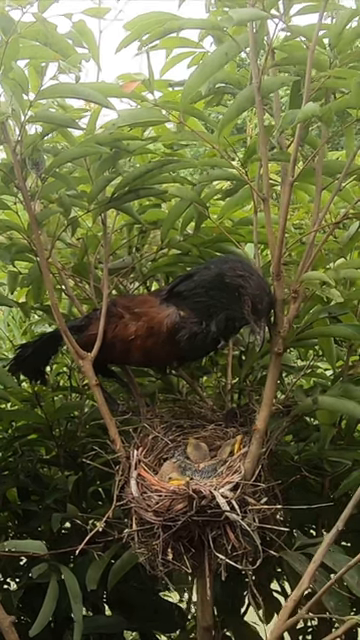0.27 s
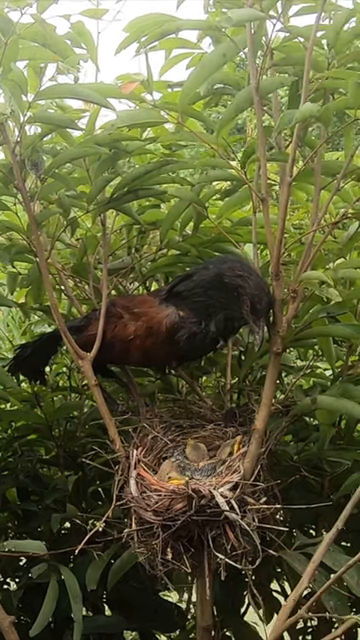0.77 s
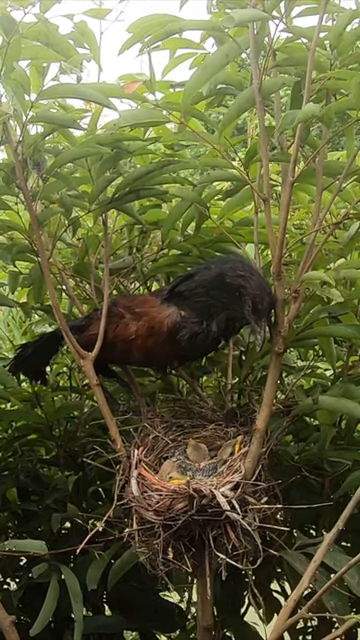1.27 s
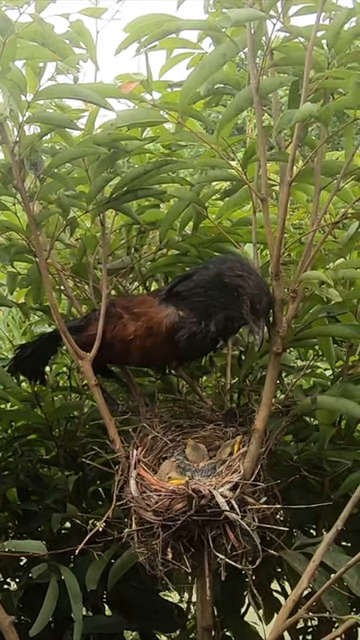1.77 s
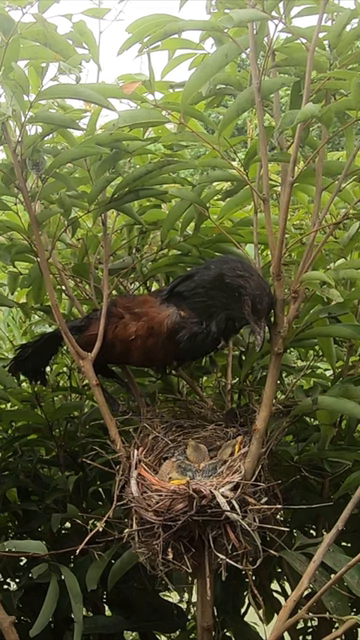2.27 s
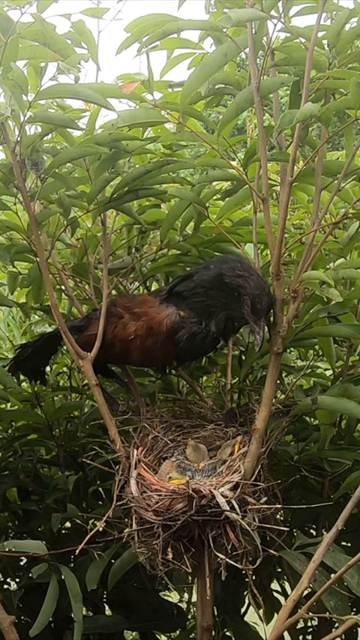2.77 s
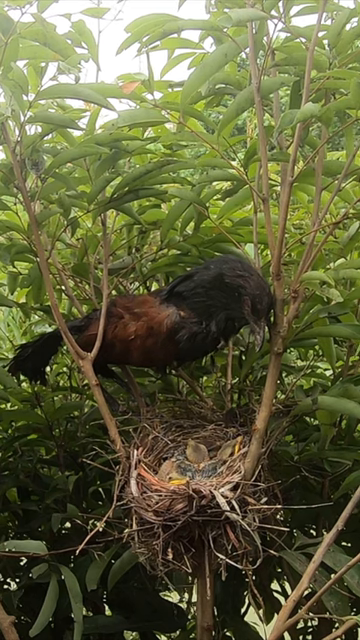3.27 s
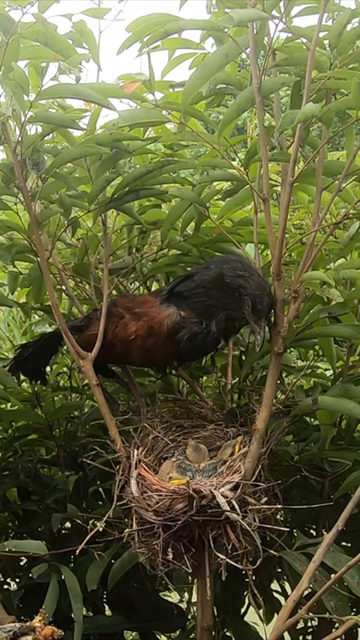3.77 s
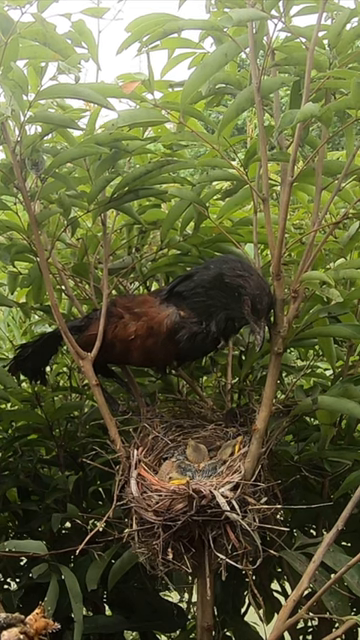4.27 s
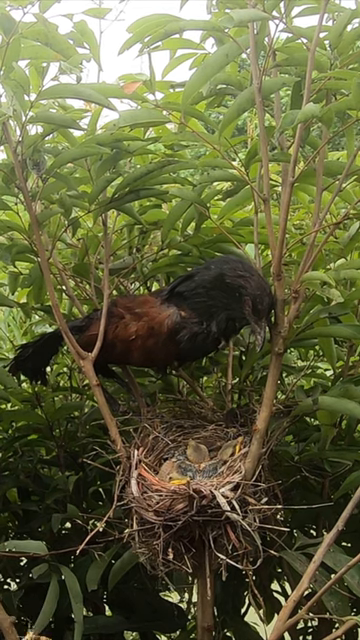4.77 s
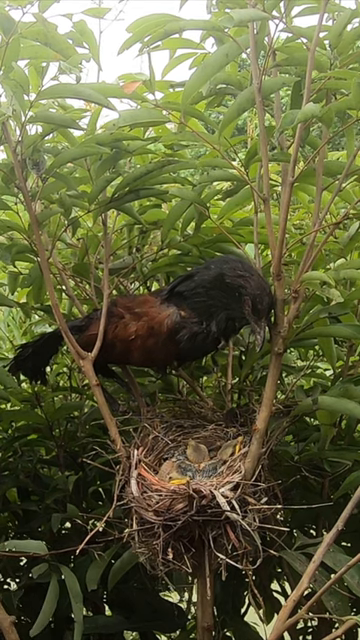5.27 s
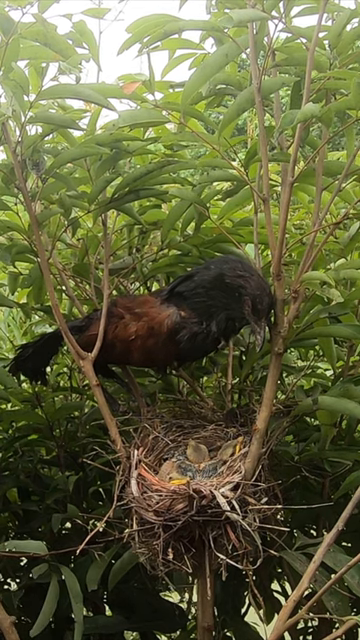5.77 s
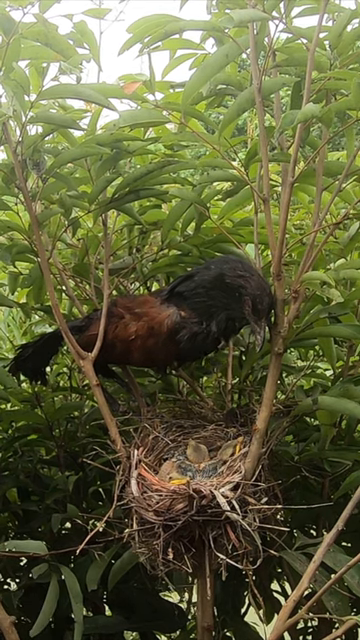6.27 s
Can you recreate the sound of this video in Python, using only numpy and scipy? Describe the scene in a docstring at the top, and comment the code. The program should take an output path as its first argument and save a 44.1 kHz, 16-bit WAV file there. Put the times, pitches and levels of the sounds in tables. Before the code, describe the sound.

A bird scolds from a leafy bush close to the microphone, giving sixteen harsh, rattling rasps across about six and a half seconds. Each lasts roughly a third of a second, grows louder and stops quickly, with a short pause before the next. The call cracks now and then, around 1 to 2.4 seconds, at 3.3 and near 5 seconds. The rasps are a little stronger from about 3 seconds and shorter toward the end. At about 1.7 seconds a low throb and rumble like a distant engine swells underneath and stays, with a faint wavering hum; at the same time the sound spreads from narrow to wide. A faint hollow drone comes and goes from about 2.6 seconds. Three soft taps fall between calls, near 2.1, 2.6 and 4.7 seconds. Quiet outdoor air continues throughout.

```python
"""Sixteen harsh rasps, close by: a bird scolding from a leafy bush.
Each rasp is a crescendo of about a hundred bursts a second, each burst a few sharp clicks ringing in
the throat; now and then the voice cracks. A low throb like a far engine swells underneath with a faint
hum, over a hollow drone, three soft taps and outdoor air. The sound starts narrow, then spreads."""
import sys
import numpy as np
from scipy import signal
from scipy.fft import rfft, irfft, next_fast_len
from scipy.io import wavfile

SR = 44100
rng = np.random.default_rng(int(sys.argv[2]) if len(sys.argv) > 2 else 0)


def dump(signal):
    """Clip the signal to [-1, 1] and save it as 16-bit WAV at the path in sys.argv[1]."""
    limited = np.clip(np.atleast_2d(signal).T, -1, 1)
    pcm = np.round(limited * 32767).astype(np.int16)
    wavfile.write(sys.argv[1], SR, pcm)


N = 287973

# start/s, end/s, relative end level/dB, crescendo/dB, 5 kHz ring/dB and 7 kHz edge/dB re body,
# flutter/Hz, flutter rise/fraction, beak opening/0-1, throat tuning/ratio, treble fizz/dB
RASP_CALLS = [(-0.1, 0.09, -28, 1.5, -8.5, -5.5, 116.8, 0.046, 0.0, 1, 3.5),
              (0.2561, 0.68, -25.5, 9.3, -9.5, -6, 113.9, 0.047, 0.0061, 1.0, 0),
              (0.8046, 1.131, -29.5, 0.87, -7.5, -6.5, 106.5, 0.028, 0.0, 1, -1.5),
              (1.2228, 1.534, -29.9, 3.8, -7, -6.5, 110, 0.084, 0.31, 1.01, -6),
              (1.665, 2.011, -26.5, 2.9, -11, -9.8, 105.9, 0.089, 0.4, 0.975, 4.0),
              (2.1601, 2.469, -25.5, 4.3, -7.5, -8.5, 105.3, 0.13, 0.54, 0.994, 6.5),
              (2.5847, 2.836, -25.5, 4.6, -6, -7, 105.6, 0.13, 1.0, 0.997, 4.5),
              (3.0156, 3.308, -23, 7.9, -5, -7, 104.1, 0.067, 0.93, 1.035, 3.5),
              (3.4475, 3.726, -24.5, 2.2, -10, -11.5, 104.9, 0.12, 0.94, 0.97, 8),
              (3.8873, 4.177, -24.5, 2.5, -7, -10, 101.6, 0.09, 0.99, 0.98, 9.5),
              (4.3231, 4.606, -24, 6, -8.5, -11.5, 103.5, 0.17, 1.0, 0.99, 4.5),
              (4.7337, 5.049, -24.5, 4.8, -5.5, -7.5, 101.75, 0.079, 0.77, 1.05, 6),
              (5.1685, 5.366, -29, 5.2, -12, -6.5, 101.1, 0.13, 0.35, 0.86, 7),
              (5.5047, 5.727, -26, 4.2, -9, -8.5, 100.3, 0.15, 0.94, 0.985, -23),
              (5.8962, 6.172, -24, 5.6, -8.5, -7.5, 101.5, 0.11, 0.89, 0.99, -29),
              (6.326, 6.528, -24, 4.3, -7.5, -8, 98, 0.086, 1.0, 1.008, -27)]
def bird(level_db=-2, shimmer_db=-13, treble_shimmer_db=-5):
    """Rasps in a bush; as the image spreads, the echoes part and the treble shimmers side to side."""
    voice = np.zeros(N)
    for row in RASP_CALLS:
        add(voice, *rasp(*row))
    echoes = foliage(voice)
    centre = echoes.mean(0)
    treble = band(voice, 7500, 16000)
    shimmer = (amp(shimmer_db) * voice + amp(treble_shimmer_db) * treble) * drift(120)
    sides = echoes - centre + np.array([shimmer, -shimmer])
    return amp(level_db) * (voice + centre + curve(STEREO_SPREAD) * sides)


# voice cracks: t/s, half length/s, body change/dB, ring and edge change/dB, fizz change/dB
VOICE_BREAKS = [(0.969, 0.012, -1, -7, 5), (1.112, 0.015, -4.8, -9, -5), (1.28, 0.017, -2.5, -8, 9),
                (1.797, 0.03, 1, 2.0, 12), (1.877, 0.014, -5, -8, 4), (2.007, 0.016, -3.5, -6, 4),
                (2.24, 0.026, -2.5, -8.5, 7.5), (2.325, 0.011, -6, -10, 7.5), (2.377, 0.0071, 4, 1.8, 10.5),
                (3.253, 0.03, -9.5, -8.5, 3.5), (3.296, 0.0085, -4, -11, 2.5), (4.95, 0.013, -3.7, -8.5, 2),
                (4.973, 0.013, -3, -3, 3.5), (5.222, 0.018, -11, -8, 3.5), (5.294, 0.011, -2.5, 2, 11.0)]
def rasp(start_s, end_s, level_db, swell_db, ring_db, edge_db, flutter_hz, rise, beak, tuning, fizz_db,
         attack_s=.026, release_db_per_s=950, glide=.011, sag=.85, full_crack_db=-8, brighten_db=4.5):
    """One call: the flutter speeds up and the throat tightens; in a crack its resonances sag."""
    t = np.arange(start_s, end_s + .04, 1 / SR)
    progress = (t - start_s) / (end_s - start_s)
    breaks = np.array([bump(t, at_s, half_s) for at_s, half_s, *_ in VOICE_BREAKS])
    body_break_db, ring_break_db, fizz_break_db = np.array(VOICE_BREAKS)[:, 2:].T @ breaks

    hz = np.fft.rfftfreq(1024, 1 / SR)
    drive = syrinx(len(t), flutter_hz, rise)
    slack = unit(resonate(drive, throat(hz / (tuning - glide), beak, fizz_db)))
    tight = unit(resonate(drive, throat(hz / (tuning + glide), beak, fizz_db)))
    cracked = unit(resonate(drive, throat(hz / (tuning * sag), beak / 2, fizz_db)))
    crack = np.clip(ring_break_db / full_crack_db, 0, 1)
    voice = np.sqrt(1 - crack ** 2) * (slack + progress * (tight - slack)) + crack * cracked
    voice = strain(voice, depth_db=3 + 3.5 * breaks.max(0))

    ring, edge, fizz = band(voice, 4780, 6100), band(voice, 6100, 9300), band(voice, 9300, 20000)
    body = voice - ring - edge - fizz
    fizz_gain = amp(fizz_break_db + brighten_db * (progress - 1))
    voice = (amp(body_break_db) * body + fizz_gain * fizz) / np.std(body)
    voice += amp(ring_break_db) * (amp(ring_db) * unit(ring) + amp(edge_db) * unit(edge))

    attack = 1 - np.exp(-(t - start_s) / attack_s)
    crescendo_db = level_db - swell_db * np.maximum(1 - progress, 0) ** 1.59  # levels off at the end
    release_db = release_db_per_s * np.maximum(t - end_s, 0)
    return start_s, voice * attack * amp(crescendo_db - release_db)


def syrinx(size, flutter_hz, rise, count=7, click_gap_ms=1.33, burst_ms=2.13, spit_ms=.65, jitter=.012):
    """Bursts of uneven clicks, each with a spit of air; the bursts quicken and lengthen."""
    progress = np.linspace(-.5, .5, size)
    cycles = np.cumsum(flutter_hz * (1 + rise * progress)) / SR
    centres = np.flatnonzero(np.diff(np.floor(cycles + .5)))
    burst_shift, burst_size = rng.standard_normal((2, len(centres), 1))
    click_gap, click_size = rng.standard_normal((2, len(centres), count))
    offset_ms = np.cumsum(click_gap_ms * np.exp(.13 * click_gap), axis=1)
    offset_ms = offset_ms - offset_ms[:, count // 2, None]
    width_ms = burst_ms * np.exp(.6 * progress)
    flat_top = bump((offset_ms / width_ms[centres, None]) ** 2, 0, 1.61)
    strength = flat_top * amp(.36 * burst_size - .34 * click_size)
    onsets = centres[:, None] + SR * (offset_ms / 1000 + jitter * burst_shift / flutter_hz)
    clicks = np.bincount(np.clip(onsets, 0, size - 1).astype(int).ravel(), strength.ravel(), size)
    spit_envelope = signal.lfilter([1], [1, -np.exp(-1000 / (spit_ms * SR))], clicks)
    spits = spit_envelope * rng.standard_normal(size)
    from_centre_ms = ((cycles + .5) % 1 - .5) * 1000 / flutter_hz
    puffs = bump(from_centre_ms, 0, width_ms) * rng.standard_normal(size)
    return smear(unit(clicks) + .49 * unit(spits) + .45 * unit(puffs))


def smear(x, delay_ms=1.3, reference_hz=8000):
    """The treble of a click leaves later, which blunts its peak."""
    hz = np.fft.rfftfreq(len(x), 1 / SR)
    return irfft(rfft(x) * np.exp(-1j * np.pi * delay_ms / 1000 * hz ** 2 / reference_hz), len(x))


# click spectrum, beak nearly shut: f/Hz, level/dB
BEAK_SHUT = [(250, -21), (540, -30), (850, -15), (1150, -17), (1600, -10.5), (2550, -3), (3300, -13),
             (3950, -1), (4400, -1.5), (5000, -15.5), (5700, -8), (7500, -11.5), (9500, -33.5),
             (12800, -34), (15500, -36)]
# click spectrum, beak wide open: f/Hz, level/dB
BEAK_OPEN = [(200, -37), (450, -17), (600, -9.5), (800, -19), (1050, -18), (1500, -12), (2000, -9.5),
             (2600, -4.5), (4300, -2.5), (5900, -12.5), (7400, -10.5), (8700, -23), (10700, -34.5),
             (12000, -28), (15000, -61)]
# resonances of throat and open beak: f/Hz, width/Hz, gain/dB
THROAT_MODES = [(2450, 420, 3), (3050, 120, -3), (3407, 217, 6), (4200, 170, -0.5), (4410, 125, 8),
                (5200, 230, 1), (6230, 39, 10.5), (6280, 110, -5.5), (6990, 330, 2.5), (12000, 340, 1)]
def throat(hz, beak, fizz_db):
    """Gain in dB of throat and beak; the resonances sharpen as the beak opens."""
    modes_db = sum(db * bump(hz, centre_hz, width_hz) for centre_hz, width_hz, db in THROAT_MODES)
    open_db = at_hz(BEAK_OPEN, hz) + modes_db
    shut_db = at_hz(BEAK_SHUT, hz) + .24 * modes_db
    treble_db = fizz_db * (bump(hz, 10200, 840) + bump(hz, 14600, 1100))
    return beak * open_db + (1 - beak) * shut_db + treble_db


def strain(x, depth_db, spacing_hz=1250, slide=.09, knots_per_s=22):
    """In a strained call, three combs of resonances slide about and come and go."""
    hz, t, spectrum = signal.stft(x, SR, nperseg=512, noverlap=384)
    knots_s = np.arange(0, t[-1] + 1, 1 / knots_per_s)
    combs = 0
    for _ in range(3):
        bend, presence = (np.interp(t, knots_s, rng.standard_normal(len(knots_s))) for _ in range(2))
        bent_hz = spacing_hz * np.exp(.25 * rng.standard_normal() + slide * bend)
        combs = combs + presence * np.cos(2 * np.pi * hz[:, None] / bent_hz)
    ripple_db = np.clip(hz / 4000, 0, 1)[:, None] * np.interp(t, np.arange(len(x)) / SR, depth_db)
    spectrum *= amp(ripple_db * np.tanh(unit(combs)))
    return signal.istft(spectrum, SR, nperseg=512, noverlap=384)[1][:len(x)]


def foliage(x, near_db=-12, near_t60_s=.02, far_db=-33, far_t60_s=.44):
    """Close leaves scatter the call at once; farther trees add a faint tail, different at each side."""
    t = np.arange(SR // 3) / SR
    reflections = rng.standard_normal((2, len(t))) * (rng.random((2, len(t))) < .2) * (t > .0005)
    near = amp(near_db) * unit(band(reflections, 2290, 16000) * amp(-60 * t / near_t60_s))
    far = amp(far_db) * unit(reflections * amp(-60 * t / far_t60_s))
    return signal.fftconvolve(x[None], (near + far) / np.sqrt(len(t)), axes=1)[:, :N]


# low throb: t/s, level/dB
THROB_LEVELS = [(0.0, -55), (0.71, -45.5), (1.29, -49), (1.73, -25), (1.87, -31), (1.93, -22), (2.18, -27),
                (2.71, -25), (2.8, -20), (3.76, -23), (4.97, -20), (5.04, -26), (5.11, -20), (6.02, -27.5),
                (6.05, -44.5), (6.18, -24.5), (6.42, -22), (6.53, -27)]
# rumble envelope: t/s, relative level/dB
RUMBLE_LEVELS = [(0.0, -56), (0.16, -49.5), (1.27, -53.5), (1.54, -45), (2.82, -39), (5.89, -37),
                 (5.93, -40), (6.53, -35)]
# rumble colour: f/Hz, level/dB
RUMBLE_SPECTRUM = [(10, -2), (20, -3), (26, 7.5), (32, -4.5), (38, 4), (48, 4.5), (72, 2.5), (82, -5),
                   (98, 3.5), (120, -8), (160, -20), (240, -33.5), (400, -68.5)]
# faint hum: t/s, relative level/dB
HUM_LEVELS = [(1.5, -77), (1.62, -81), (1.84, -59), (2.66, -55), (2.7, -64), (3.74, -52), (4.43, -59.5),
              (4.68, -53), (5.13, -66), (5.32, -56.5), (5.35, -66), (5.48, -50.5), (5.58, -68), (5.98, -59),
              (6.08, -85), (6.26, -62), (6.53, -64)]
def engine(throb_hz=53.15, hum_hz=336.4, rumble_db=5.5, hum_db=-.5):
    """Like a far engine: a near-sine throb in lumpy rumble, a wavering hum above."""
    throb = amp(curve(THROB_LEVELS) + .7 * drift(8.7)) * tone(throb_hz, waver_hz=.5, per_s=4.6)
    lumps = amp(curve(RUMBLE_LEVELS) + rumble_db + drift(5.5))
    rumble = lumps * noise(lambda hz: amp(at_hz(RUMBLE_SPECTRUM, hz)))
    hum = amp(curve(HUM_LEVELS) + hum_db + 1.8 * drift(4.8)) * tone(hum_hz, waver_hz=3.7, per_s=10.7)
    return throb + rumble + hum


# swells: t/s, half length/s, relative level/dB
DRONE_SWELLS = [(2.64, 0.078, -48.5), (3.0, .06, -46.5), (3.433, 0.083, -47), (4.604, 1, -54.5)]
# resonances: f/Hz, width/Hz, level/dB
DRONE_MODES = [(458, 29, -10), (547, 22, -1.5), (669, 29, -4.5), (800, 25, -12)]
def drone(level_db=-2):
    """Faint hollow swells of noise in narrow resonances."""
    t = np.arange(N) / SR
    swells = sum(amp(db + level_db) * bump(t, at_s, half_s) for at_s, half_s, db in DRONE_SWELLS)
    return swells * noise(lambda hz: sum(amp(db) * bump(hz, f, width) for f, width, db in DRONE_MODES))


# taps between rasps: t/s, level/dB, f/Hz, width/Hz
SOFT_TAPS = [(2.144, -47, 2110, 120), (2.567, -55.5, 910, 810), (4.695, -50.5, 900, 554)]
def tap(start_s, level_db, centre_hz, width_hz, t60_s=.14, rise_s=.0052):
    """A soft knock or tick: a band of noise that dies quickly."""
    age_s = np.maximum(np.arange(N) / SR - start_s, 0)
    envelope = np.minimum(age_s / rise_s, 1) * amp(level_db - 60 * np.minimum(age_s / t60_s, 2))
    return envelope * noise(lambda hz: bump(hz, centre_hz, width_hz))


# outdoor wash: f/Hz, level/dB
AIR_SPECTRUM = [(100, -6), (350, 2), (600, 4), (1000, -3.5), (1500, -8), (2500, -24.5), (4500, -26.5),
                (7000, -20.5), (10000, -47.5), (15000, -60)]
def air(wash_db=-60, narrow_db=-8, sway_db=1.5, roar_db=-55.5):
    """A soft outdoor wash that grows as the image spreads, over a steady low roar."""
    wash = wide_noise(lambda hz: amp(at_hz(AIR_SPECTRUM, hz)), apart=1)
    roar = wide_noise(lambda hz: bump(hz, 87, 165), apart=1.2)
    level_db = wash_db + narrow_db * (1 - curve(STEREO_SPREAD)) + sway_db * drift(5.9)
    return amp(level_db) * wash + amp(roar_db) * roar


def amp(db):
    return 10 ** (np.asarray(db) / 20)


def unit(x):
    """Scales to rms 1."""
    return x / np.sqrt(np.mean(x ** 2) + 1e-20)


def at_hz(points, hz, column=1):
    """Reads a spectrum table on a log-frequency axis."""
    table = np.transpose(points)
    return np.interp(np.log(hz + 1), np.log(table[0] + 1), table[column])


def curve(points):
    """Reads a time table at every sample."""
    return np.interp(np.arange(N) / SR, *np.transpose(points))


def bump(x, centre, width):
    """Gaussian of height 1."""
    return np.exp(-.5 * ((x - centre) / width) ** 2)


def add(mix, start_s, sound):
    """Mixes a sound in; start_s may be negative."""
    at = round(start_s * SR)
    sound = sound[max(-at, 0):]
    part = mix[max(at, 0):][:len(sound)]
    part += sound[:len(part)]


def band(x, low_hz, high_hz):
    """Zero-phase band-pass."""
    return signal.sosfiltfilt(signal.butter(5, [low_hz, high_hz], "bandpass", fs=SR, output="sos"), x)


def resonate(x, gain_db):
    """Minimum-phase filter: each click rings after it strikes."""
    log_gain = np.log(amp(np.concatenate([gain_db, gain_db[-2:0:-1]])))
    response = np.fft.ifft(np.exp(np.conj(signal.hilbert(log_gain)))).real
    return signal.fftconvolve(x, response[:len(gain_db)])[:len(x)]


def drift(per_s):
    """Smooth random wander, rms 1."""
    steps = np.arange(N) / SR * per_s * 20
    wander = np.convolve(rng.standard_normal(int(steps[-1]) + 30), signal.windows.hann(17), "valid")
    return unit(np.interp(steps, np.arange(len(wander)), wander))


def tone(hz, waver_hz, per_s):
    """Sine of wandering pitch, rms 1."""
    return unit(np.sin(2 * np.pi * np.cumsum(hz + waver_hz * drift(per_s)) / SR))


def noise(gain):
    """Noise with spectrum gain(hz), rms 1."""
    size = next_fast_len(N)
    return unit(irfft(rfft(rng.standard_normal(size)) * gain(np.fft.rfftfreq(size, 1 / SR)), size)[:N])


def wide_noise(gain, apart):
    """Noise whose two sides part as the image spreads."""
    shared, left, right = (noise(gain) for _ in range(3))
    own = np.clip(apart * curve(STEREO_SPREAD), 0, 1)
    return np.sqrt(1 - own ** 2) * shared + own * np.array([left, right])


def scene():
    """The bird over its surroundings."""
    return bird() + engine() + drone() + air() + sum(tap(*row) for row in SOFT_TAPS)


# image width: t/s, spread/0-1
STEREO_SPREAD = [(1.45, 0.084), (1.8, 0.62), (2.3, 0.75), (3.0, 0.75)]
# microphone pair at spread 1: f/Hz, left minus right/dB, left lead/rad
MIC_PORTS = [(232, -6.5, 0.5), (320, -20, 2.6), (590, -14.5, -4), (810, 0, -2.5), (1240, 1.5, 1.18),
             (2000, 0, 0.5), (2840, -12.5, 0.54), (2930, -3.5, 2), (3530, -6.5, 0.4), (5060, 0.5, -2.5),
             (5740, 3, -2), (6780, -9, -2.5), (7060, 9.5, 2), (8700, -1.5, 3), (9500, 1.5, 1.3),
             (12000, -0.5, 2.5)]
def record(dry, cutoff_hz=15600):
    """Two microphone ports colour and delay the sound differently as it spreads; then a low-pass."""
    faded = dry * signal.windows.tukey(N, .0007)
    hz, t, spectrum = signal.stft(faded, SR, nperseg=1024, noverlap=768)
    log_ratio = np.log(amp(at_hz(MIC_PORTS, hz))) + 1j * at_hz(MIC_PORTS, hz, column=2)
    per_side = .5 * log_ratio[:, None] * np.interp(t, *np.transpose(STEREO_SPREAD))
    pair = signal.istft(spectrum * np.exp([per_side, -per_side]), SR, nperseg=1024, noverlap=768)[1]
    lowpass = signal.firwin(511, cutoff_hz, window=("kaiser", 9), fs=SR)
    return signal.oaconvolve(pair[:, :N], lowpass[None], "same")


dry = scene()
out = record(dry)
dump(out)
```